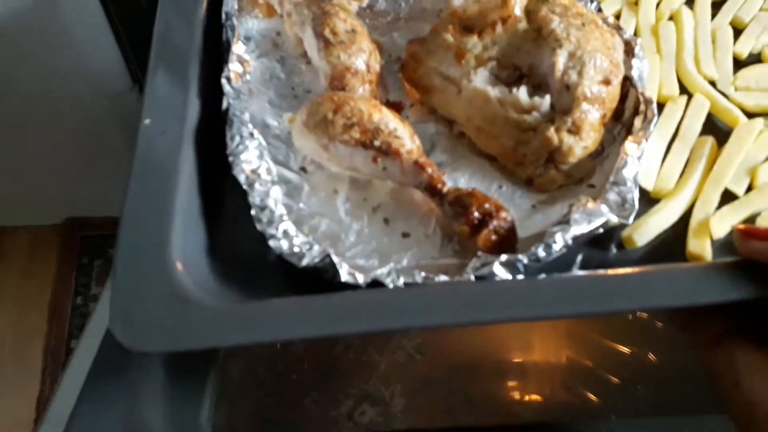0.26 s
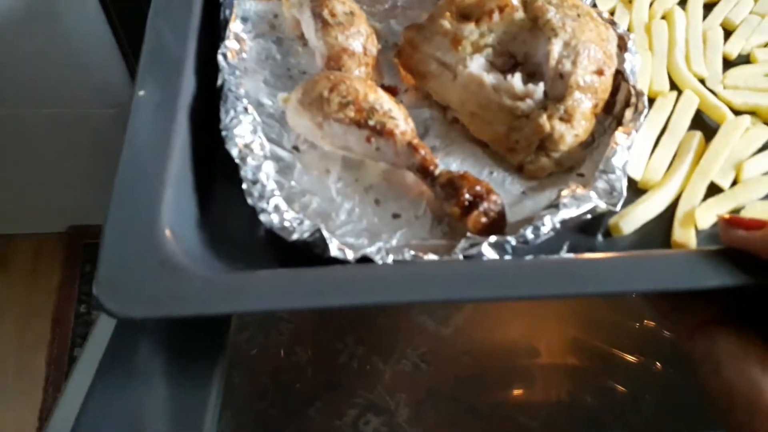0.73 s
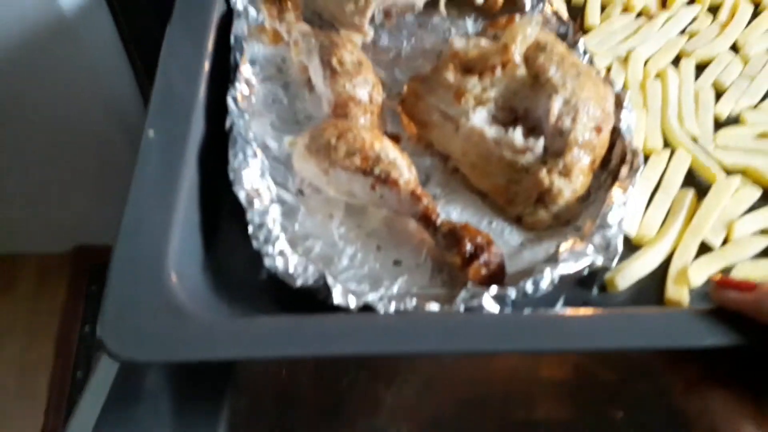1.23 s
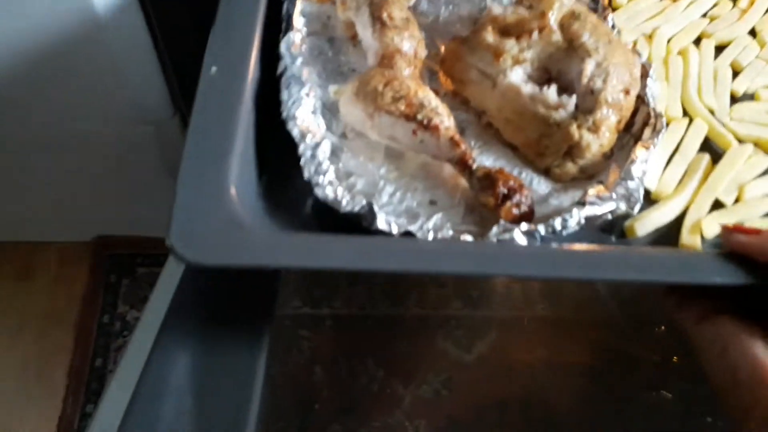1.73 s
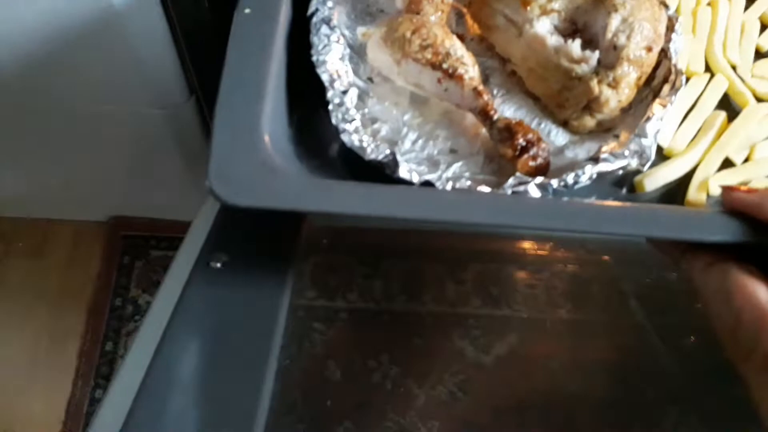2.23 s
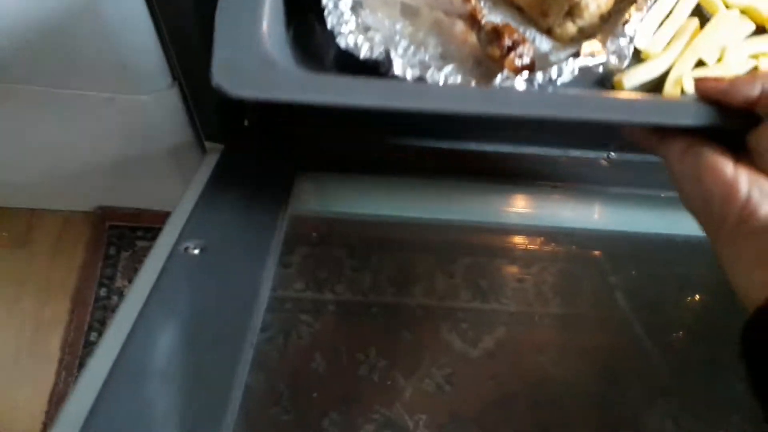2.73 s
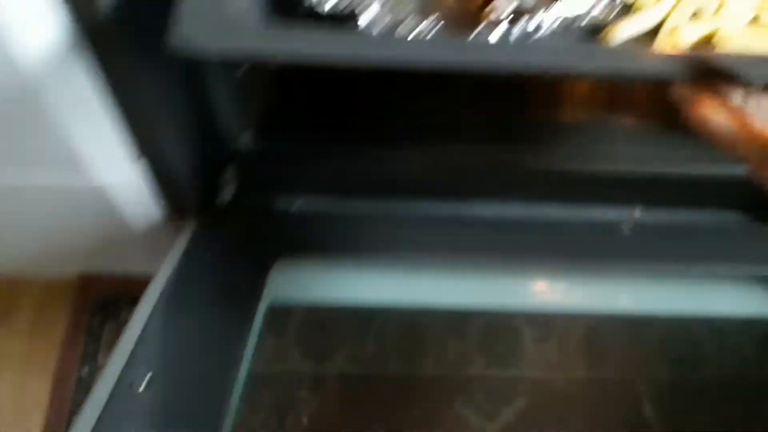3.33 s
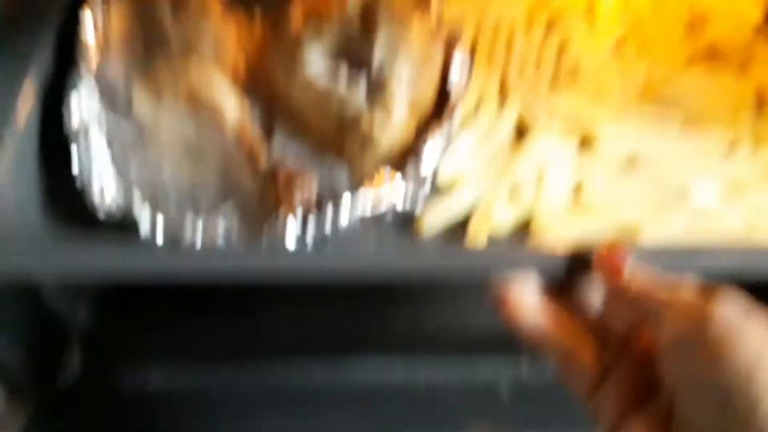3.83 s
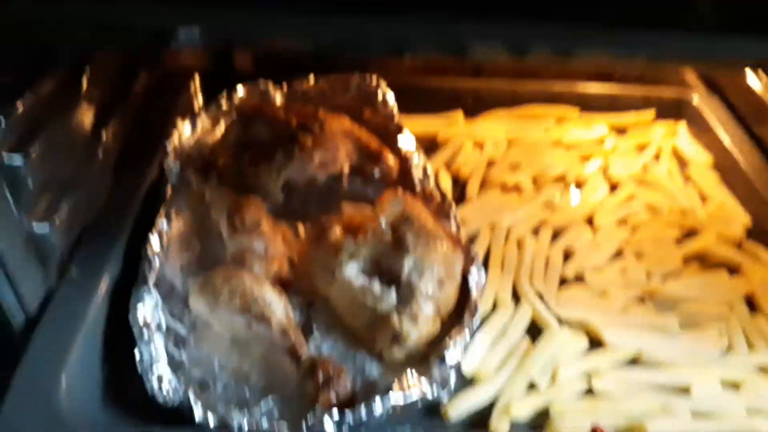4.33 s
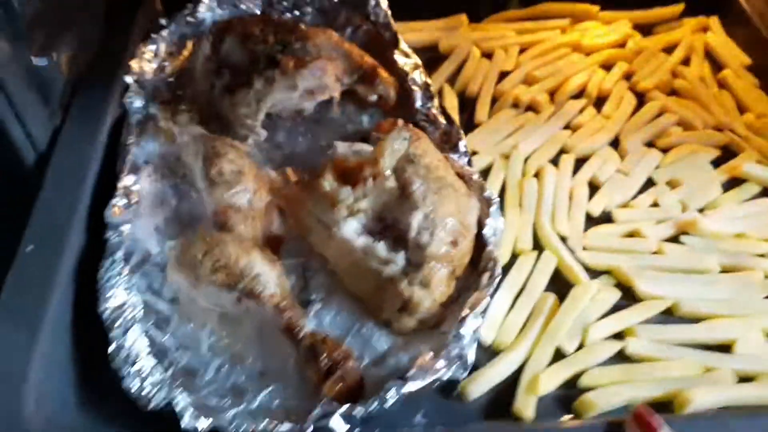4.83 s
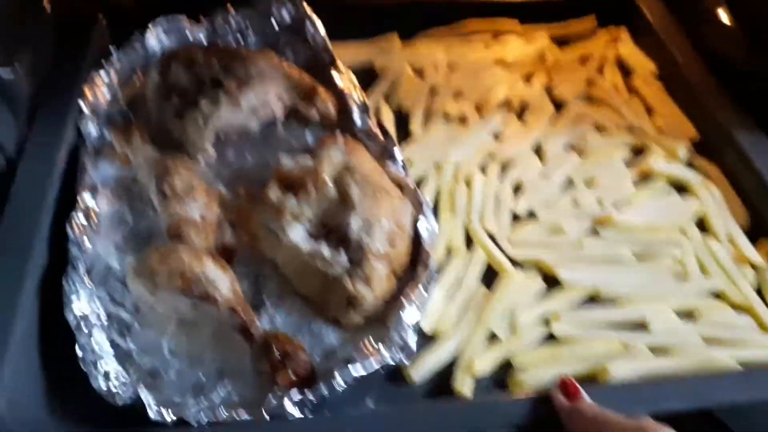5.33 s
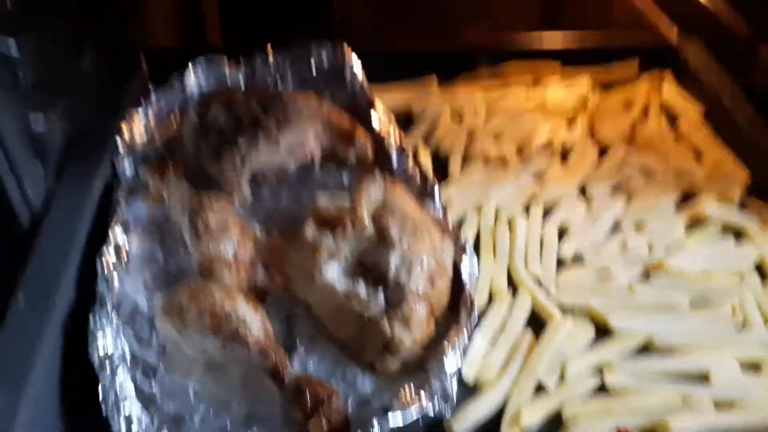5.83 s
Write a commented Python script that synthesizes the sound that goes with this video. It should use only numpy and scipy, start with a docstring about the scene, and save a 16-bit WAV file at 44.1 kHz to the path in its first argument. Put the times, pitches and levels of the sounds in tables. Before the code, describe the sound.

A loaded steel baking tray clanks and bangs onto oven runners, then scrapes inward with gritty pushes and crackling foil-like fizz, heard close up.

```python
"""Knocks come first: a loaded steel baking tray hits the runners of an oven, is slid in and nudged home, up close.
Each knock rings decaying tray modes over shaped noise for the dense ring of the oven box.
Grit under the rim scrapes as coloured grains, and the rubbing sets the tray's modes murmuring.
A crackling fizz, as of foil and hot fat, outlasts the first slide: fine grains plus single pops.
A short low hum is a gliding sine. One microphone feeds both channels."""
import sys
import numpy as np
from scipy import signal
from scipy.fft import rfft, irfft
from scipy.io import wavfile
from scipy.ndimage import uniform_filter1d

SR = 44100
rng = np.random.default_rng(int(sys.argv[2]) if len(sys.argv) > 2 else 0)


def to_wav(sig):
    """Store sig (one row per channel, or 1-D mono) as 16-bit WAV at the path in sys.argv[1].

    Samples outside -1..1 are clipped; the rate is SR.
    """
    pcm = np.clip(np.atleast_2d(sig), -1, 1) * 32767
    pcm = np.round(pcm).astype(np.int16)
    wavfile.write(sys.argv[1], SR, pcm.T)  # frames by channels


N = 267687

# knocks of tray on runner: (time [s], level [dB], boom re clank [dB], treble re clank [dB],
# ring length [factor], favoured low pitch [Hz], favoured high pitch [Hz])
KNOCKS = [(0.219, -53.5, -43, 7, 0.93, 253, 3820), (0.436, -25.5, -3.5, -12.5, 0.9, 114, 3580),
          (0.592, -16.5, -7, -4.5, 0.88, 254, 4350), (0.632, -24, -15, -21, 0.45, 182, 1050),
          (0.676, -26.5, -0.5, -14, 0.56, 308, 3420), (0.721, -34, -9, -20, 0.68, 355, 1090),
          (0.844, -32, -3, -9, 0.82, 172, 2810), (0.89, -34.5, -4, -14.5, 0.9, 325, 1680),
          (1.115, -48.5, 2, 0, 0.74, 293, 1750), (1.17, -26, -7, -14.5, 1.0, 334, 1140),
          (1.206, -30.5, -4, -29, 1.0, 331, 3280), (1.229, -29, -1.5, -8.5, 0.35, 116, 1830),
          (1.257, -18.5, -9, -10, 0.63, 325, 1010), (1.319, -26.5, 0, -18, 0.89, 224, 1040),
          (1.414, -17, -4, -12.5, 0.75, 343, 1020), (1.433, -19.5, -9, -11, 1.0, 345, 3410),
          (1.463, -15.5, -7.5, -7, 0.71, 284, 920), (1.541, -28, -1, -40.5, 0.75, 228, 1520),
          (1.696, -6.5, -5.5, -5, 0.77, 260, 1280), (1.723, -11.5, -2.5, -7, 0.57, 254.3, 2600),
          (1.787, -32, 4.5, -1.5, 0.78, 129, 1460), (1.923, -45, -1, 0, 0.38, 217, 2730),
          (2.074, -25, -5, -7.5, 0.71, 182, 3820), (2.092, -26, -3, -7, 0.61, 504, 1470),
          (2.113, -29, 0.5, -7.5, 0.89, 121, 1660), (2.181, -26, -4, -30, 0.3, 167, 1380),
          (2.212, -27.5, -9, -6.5, 0.54, 129, 2600), (2.31, -40.5, -8, 0, 1, 187, 3900),
          (2.322, -34, -6.5, -7, 0.92, 188, 3730), (4.962, -20.5, -11.5, -4.5, 0.67, 145, 2200),
          (5.038, -38.5, -3.5, 7.5, 0.75, 130, 4250), (5.153, -20, -9.5, -7.5, 0.66, 227, 3630),
          (5.228, -35, -8, -6, .9, 660, 1720), (5.263, -38.5, -9, 3.5, 0.44, 119, 4260),
          (5.343, -38, -22, 2, 0.34, 280, 4060), (5.391, -43, -39, 3, 1.0, 293, 4350),
          (5.458, -17, -8.5, -2, 0.57, 142, 3900), (5.498, -32.5, -4, -5, 1, 211, 2620),
          (5.764, -50, 3, -13, 0.89, 144, 1710), (5.99, -31.5, -2, -5.5, 1, 180, 1740)]
# modes of the tray: (frequency [Hz], level [dB], t60 at ring length 1 [s])
TRAY_MODES = [(95.5, -17, 0.64), (121, -0.5, 0.28), (154.1, -2.5, 0.23), (186.2, -2.5, .3),
              (218.8, -5.5, 0.22), (241, -0.5, 0.19), (284, -3, 0.13), (345.5, -8.5, 0.27),
              (426.4, -12, 0.31), (478, -16.5, 0.51), (542.7, -9.5, 0.26), (572, -16, .2),
              (1022, -16, 0.048), (1243, -30.5, 0.36), (1366, -21, 0.13), (1522, -21, 0.18),
              (1882, -16.5, 0.056), (2070, -23.5, 0.1), (2378, -21, 0.059), (2550, -29, .16),
              (2620, -17.5, 0.057), (2810, -18.5, 0.11), (3340, -25, 0.23), (3655, -19.5, 0.16),
              (3950, -24.5, 0.2), (4950, -24, .14), (1113, -21, 0.2), (4450, -18.5, 0.083),
              (3073, -20, 0.14), (5070, -21, .11)]
# spectrum of the dense ring: (frequency [Hz], relative density [dB per Hz])
DENSE_RING_COLOUR = [(35, -31), (60, -11), (96, -10.5), (255, -3), (563, -21.5), (647, -21), (985, -25.5),
                     (2080, -23.5), (2450, -23), (3020, -25), (6990, -26), (9910, -24), (15800, -37)]
# decay of the dense ring: (frequency [Hz], t60 at ring length 1 [s])
DENSE_RING_T60 = [(80, 0.14), (210, 0.37), (560, 0.42), (1470, 0.25), (3880, 0.23), (10200, 0.2)]
# rim on runner, through the fumbling start and three pushes: (time [s], scrape [dB], tray rumble [dB])
SLIDE_LEVELS = [(0.45, -87, -59), (0.93, -64, -50.5), (1.15, -68.5, -54), (1.6, -51, -44.5),
                (2.0, -56.5, -47.5), (2.61, -52, -54.5), (2.82, -46.5, -48), (2.89, -42, -40.5),
                (3.07, -43.5, -51), (3.12, -44, -41), (3.21, -47, -43), (3.25, -58.5, -49.5),
                (3.39, -75, -67), (3.87, -84.5, -75.5), (4.17, -89, -65), (4.31, -91, -76),
                (4.35, -78, -64.5), (4.44, -88, -63), (4.52, -52.5, -51), (4.6, -39, -48.5),
                (4.73, -37, -47), (5.0, -44.5, -43), (5.08, -51.5, -50), (5.24, -46.5, -45),
                (5.36, -63, -65), (5.72, -61.5, -53), (5.8, -49.5, -46), (5.99, -38.5, -41.5),
                (6.07, -39.5, -46)]
# spectrum of the scraping grit: (frequency [Hz], relative density [dB per Hz])
GRIT_COLOUR = [(240, -35.5), (400, 0), (561, -2), (740, -7.5), (1120, 3), (1650, 2), (1890, 0.5), (2530, 4),
               (6990, -1.5), (9810, -12.5), (15800, -22.5)]
# fizz apart from that shaken up by the slide: (time [s], level [dB])
FIZZ_LEVELS = [(0.45, -88), (0.85, -91), (0.92, -64.5), (1.2, -91), (1.36, -74), (2.05, -60.5), (2.13, -50),
               (2.62, -55.5), (3.01, -44), (3.26, -41.5), (3.31, -39), (3.56, -47), (3.84, -53),
               (4.13, -63), (4.24, -68), (4.34, -59.5), (4.46, -62), (4.52, -44), (4.63, -41.5),
               (4.93, -50.5), (5.33, -56), (5.49, -78), (5.75, -54), (5.89, -45), (6.07, -69)]
# spectrum of fizz and pops: (frequency [Hz], relative density [dB per Hz])
FIZZ_COLOUR = [(1410, -48), (2400, -17), (4010, -10.5), (4440, -10.5), (5080, -3), (7130, -5), (7960, -5),
               (9770, 2.5), (12700, -0.5), (15800, -2.5)]
# single pops of the fizz: (time [s], level [dB])
POPS = [(2.445, -31), (2.4887, -25.5), (3.176, -41), (3.2819, -38), (3.3145, -25), (3.5103, -33),
        (3.5335, -35.5), (3.6573, -36), (3.7477, -34), (3.7766, -33), (3.8305, -39), (3.927, -49),
        (4.037, -52), (4.071, -35), (4.116, -43), (4.1425, -50.5), (4.156, -44), (4.2345, -60.5),
        (4.2856, -41.5), (5.4252, -34), (5.8765, -42), (5.9424, -52)]
# spectrum of the room and recorder floor: (frequency [Hz], relative density [dB per Hz])
FLOOR_COLOUR = [(15, -29), (25, 2.5), (80, 5), (241, 5), (361, -6), (542, -4.5), (587, -13.5), (637, -10),
                (1060, -11), (1320, -15.5), (1820, -16), (9720, -17), (15800, -17)]

ACCENT_DB = 7  # lift of the favoured pitches
# skid and shudder after each knock: level re the knock, decay, linear onset
SKID_DB, SKID_T60_S = -32, 0.28
SHUDDER_DB, SHUDDER_T60_S = -25.5, 0.7
SETTLE_S = 0.027
RUB_HZ, RUB_RMS_OCTAVES = 1670, 0.2  # centre of the rubbing colour, its wander
SHAKEN_DB = -9  # fizz shaken up by the slide, re scrape
# lower edge of the fizz; climbs while the tray rests between the first two pushes
FIZZ_EDGE_HZ, FIZZ_TOP_EDGE_HZ = 2100, 8700
REST_START_S, REST_END_S, THINNING_OCT_PER_S = 3.55, 4.46, 5.3
POP_ATTACK_S, POP_DECAY_S, POP_TAIL_S = 0.0006, 0.00093, 0.023
# hum ahead of the last big knock; starts flat by a fraction of its pitch
HUM_START_S, HUM_LENGTH_S, HUM_DB = 5.335, 0.121, -50.5
HUM_HZ, HUM_FLAT_FRACTION, HUM_GLIDE_S = 304, 0.13, 0.05
FLOOR_DB, BAND_EDGE_HZ = -72, 15900


def amp(db):
    """Gain from decibels."""
    return 10 ** (np.asarray(db) / 20)


def evened(x):
    """Scales to rms 1."""
    return x / np.sqrt(np.mean(x ** 2) + 1e-20)


def read(points, hz):
    """Value of a (Hz, value) table on a log-frequency axis."""
    f, value = np.transpose(points)
    return np.interp(np.log(hz + 1), np.log(f + 1), value)


def curve(table, column):
    """One column of a time table, interpolated at every sample."""
    rows = np.array(table)
    return np.interp(np.arange(N) / SR, rows[:, 0], rows[:, column])


def add(mix, start_s, sound):
    """Mixes a sound in place at a time, cut off at the end of the mix."""
    part = mix[round(start_s * SR):][:len(sound)]
    part += sound[:len(part)]


def coloured(x, points, tilt_db_per_octave=0.0):
    """Filters by a table's spectrum, tilted about 10 kHz, to rms 1."""
    hz = np.fft.rfftfreq(len(x), 1 / SR)
    gain_db = read(points, hz) + tilt_db_per_octave * np.log2((hz + 1) / 1e4)
    return evened(irfft(rfft(x) * amp(gain_db), len(x)))


def wander(samples):
    """Slow random drift of rms 1: noise smoothed twice over a number of samples."""
    once = uniform_filter1d(rng.standard_normal(N), samples)
    return evened(uniform_filter1d(once, samples))


def grains(per_s, spread_db, bed):
    """Sparse clicks of unequal size over a bed of noise."""
    sizes = amp(spread_db * np.minimum(rng.exponential(1, N), 3.0)) * rng.standard_normal(N)
    clicks = sizes * (rng.random(N) < per_s / SR)
    return evened(clicks) + bed * rng.standard_normal(N)


def knock(level_db, boom_db, treble_db, ring, low_hz, high_hz):
    """A blow rings the tray's modes, most near two pitches set by where it lands, over the oven's dense ring."""
    t = np.arange(15360) / SR

    def tone_db(f):
        near_high = np.exp(-(np.log((f + 1) / high_hz) / 0.22) ** 2)
        near_low = np.exp(-(np.log((f + 1) / low_hz) / 0.17) ** 2)
        balance_db = read([(350, boom_db), (900, 0.011), (4500, 0.011), (8000, treble_db)], f)
        return balance_db + ACCENT_DB * (near_high + near_low)

    hz, mode_db, t60_s = np.transpose(TRAY_MODES)
    luck, phase = rng.standard_normal((2, len(hz)))
    start_db = mode_db + tone_db(hz) + 2.5 * luck
    rise = 1 - np.exp(-t * hz[:, None] / 0.89)  # builds over a cycle or two, so bass is slower
    fall = amp(start_db[:, None] - 60 * t / (ring * t60_s[:, None]))
    tones = np.sin(2 * np.pi * hz[:, None] * t + 4 * phase[:, None])
    modes = (rise * fall * tones).sum(0)

    f, frame_s, spectrum = signal.stft(rng.standard_normal(len(t)), SR, nperseg=256)
    colour_db = (read(DENSE_RING_COLOUR, f) + tone_db(f))[:, None]
    decay_db = 60 * frame_s / (ring * read(DENSE_RING_T60, f)[:, None])
    dense = signal.istft(spectrum * amp(colour_db - decay_db), SR, nperseg=256)[1][:len(t)]
    crack = 1 + 0.46 * np.exp(-t / 0.0048)  # first contact stands above the ring

    onset = np.minimum(t / 0.002, 1)
    return amp(level_db) * (amp(-1.5) * modes + amp(20.5) * dense * crack) * onset


def after_knocks(under_db, t60_s):
    """After every knock the tray skids and shudders: amplitude swells and dies with the knock's level."""
    t = np.arange(SR // 2) / SR
    power = np.zeros(N)
    shape = amp(under_db - 60 * t / t60_s) * np.minimum(t / SETTLE_S, 1)
    for start_s, level_db, *_ in KNOCKS:
        add(power, start_s, (amp(level_db) * shape) ** 2)
    return np.sqrt(power)


def after_second_knock():
    """Gate: slide and fizz are silent until the second knock."""
    return np.arange(N) > KNOCKS[1][0] * SR


def rubbed(scrape):
    """Rubbing colour: a narrow spectral lift roams with the stroke, over a patchy spectrum."""
    f, frame_s, spectrum = signal.stft(scrape, SR, nperseg=512)
    frame_at = np.minimum(frame_s * SR, N - 1).astype(int)
    centre_hz = RUB_HZ * 2 ** (RUB_RMS_OCTAVES * wander(samples=2500))[frame_at]
    patches = uniform_filter1d(rng.standard_normal(spectrum.shape), 3, 0)  # across frequency
    patches = evened(uniform_filter1d(patches, 9, 1))  # across time
    lift = np.exp(-(np.log((f[:, None] + 1) / centre_hz) / 0.12) ** 2)
    spectrum = spectrum * amp(6.2 * lift + 2.6 * patches)
    return evened(signal.istft(spectrum, SR, nperseg=512)[1][:N])


def slide():
    """Grit under the rim scrapes and excites the high modes; coarser bumps shake the low modes into a rumble."""
    grit = grains(per_s=2500, spread_db=-0.5, bed=1.0) * amp(1.6 * wander(samples=400))
    bumps = grains(per_s=120, spread_db=0.5, bed=1.0)

    t = np.arange(8192) / SR
    low_modes, high_modes = np.zeros(len(t)), np.zeros(len(t))
    for hz, mode_db, t60_s in TRAY_MODES:
        mode = amp(mode_db - 60 * t / (0.83 * t60_s)) * np.sin(2 * np.pi * hz * t)
        if hz < 700:
            low_modes += mode
        else:
            high_modes += mode

    scrape_gain = np.hypot(amp(curve(SLIDE_LEVELS, column=1)), after_knocks(SKID_DB, SKID_T60_S))
    rumble_gain = np.hypot(amp(curve(SLIDE_LEVELS, column=2)), after_knocks(SHUDDER_DB, SHUDDER_T60_S))
    # light contact lets the modes ring
    ringing = np.interp(20 * np.log10(scrape_gain), [-62, -46], [0.9, 0.45])
    murmur = evened(signal.oaconvolve(grit, high_modes)[:N])
    scrape = rubbed(coloured(grit, GRIT_COLOUR) + ringing * murmur)
    rumble = evened(signal.oaconvolve(bumps, low_modes)[:N])
    return after_second_knock() * (scrape_gain * scrape + rumble_gain * rumble)


def fizz():
    """Tiny clumped crackles, thinned from below while the tray rests, and larger pops with a short tail."""
    crackle = grains(per_s=700, spread_db=3.5, bed=1.4)
    crackle = crackle * amp(1.0 * wander(samples=250))  # clumps
    f, frame_s, spectrum = signal.stft(coloured(crackle, FIZZ_COLOUR), SR, nperseg=256)
    rested_s = np.maximum(frame_s - REST_START_S, 0) * (frame_s < REST_END_S)
    edge_hz = np.minimum(FIZZ_EDGE_HZ * 2 ** (THINNING_OCT_PER_S * rested_s), FIZZ_TOP_EDGE_HZ)
    octaves_under = np.maximum(np.log2(edge_hz / (f[:, None] + 1)), 0)
    thinned = signal.istft(spectrum * amp(-14.0 * octaves_under), SR, nperseg=256)[1][:N]

    own_gain = amp(curve(FIZZ_LEVELS, column=1))
    shaken_gain = amp(curve(SLIDE_LEVELS, column=1) + SHAKEN_DB)
    out = after_second_knock() * np.hypot(own_gain, shaken_gain) * thinned

    t = np.arange(2048) / SR
    attack = np.minimum(t / POP_ATTACK_S, 1)
    envelope = attack * (np.exp(-t / POP_DECAY_S) + 0.16 * np.exp(-t / POP_TAIL_S))
    for start_s, level_db in POPS:
        burst = coloured(rng.standard_normal(len(t)), FIZZ_COLOUR, tilt_db_per_octave=3.2)
        add(out, start_s, amp(level_db) * burst * envelope)
    return out


def hum():
    """A soft sine, slightly unsteady in pitch and level, glides up to its pitch."""
    t = np.arange(0, HUM_LENGTH_S, 1 / SR)
    glide = 1 - HUM_FLAT_FRACTION * np.exp(-t / HUM_GLIDE_S)
    pitch_hz = HUM_HZ * glide * (1 + 0.018 * wander(samples=500)[:len(t)])
    tone = np.sqrt(2) * amp(HUM_DB) * np.sin(2 * np.pi * np.cumsum(pitch_hz) / SR)
    fade = np.minimum(t / 0.019, 1) * signal.windows.tukey(len(t), 0.2)
    return tone * fade * amp(1.2 * wander(samples=400)[:len(t)])


def scene():
    """Knocks, slide, fizz and hum, alike in both channels."""
    mix = slide() + fizz()
    add(mix, HUM_START_S, hum())
    for start_s, *blow in KNOCKS:
        add(mix, start_s, knock(*blow))
    return np.array([mix, mix])


def record(dry):
    """The small microphone drops deep bass, adds a quiet floor, rounds the hardest peaks and limits the band."""
    thin = signal.sosfilt(signal.butter(4, 75.0, "high", fs=SR, output="sos"), dry)
    floor = amp(FLOOR_DB) * coloured(rng.standard_normal(N), FLOOR_COLOUR)
    over = np.maximum(abs(thin) - 0.7, 0)
    rounded = thin - np.sign(thin) * (over - 0.27 * np.tanh(over / 0.27))  # stays under 0.97
    lowpass = signal.firwin(511, BAND_EDGE_HZ, window=("kaiser", 9), fs=SR)
    return signal.oaconvolve(rounded + floor, lowpass[None], "same")


dry = scene()
out = record(dry)
to_wav(out)
```